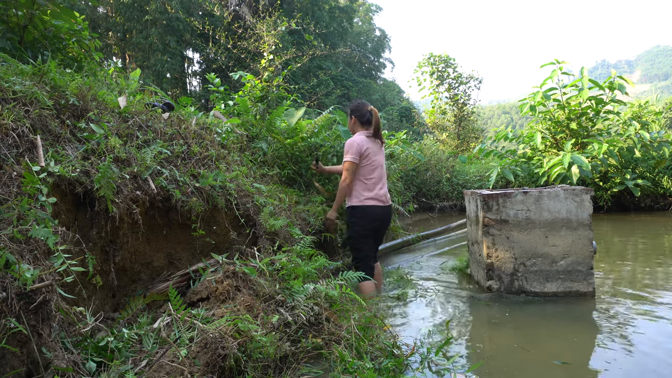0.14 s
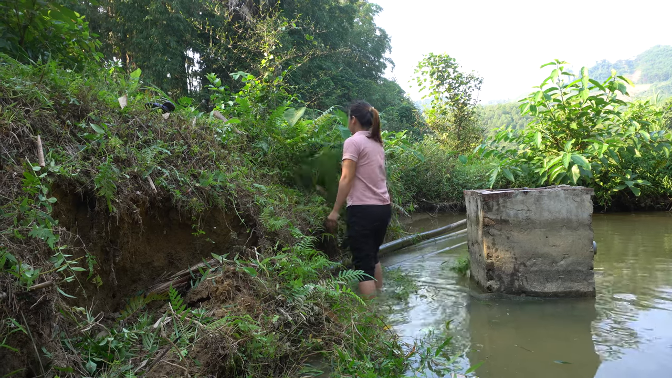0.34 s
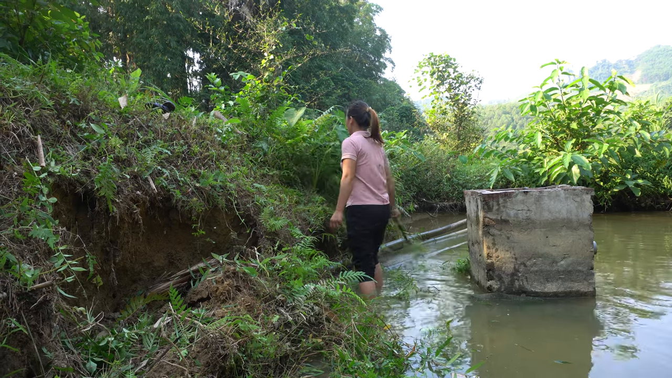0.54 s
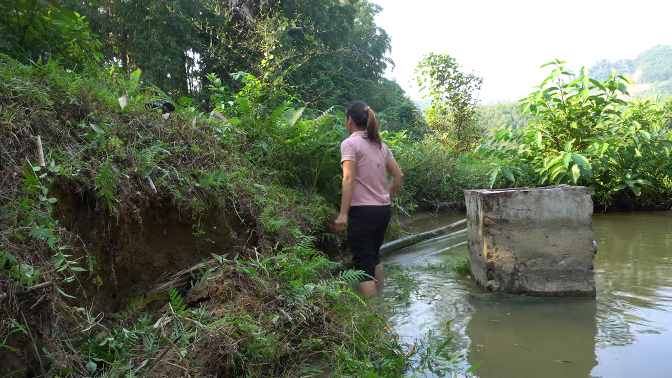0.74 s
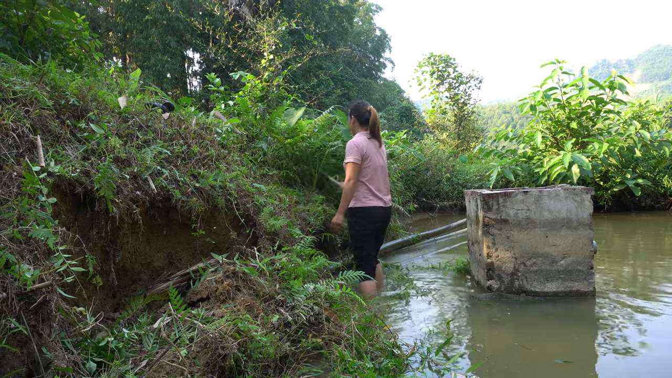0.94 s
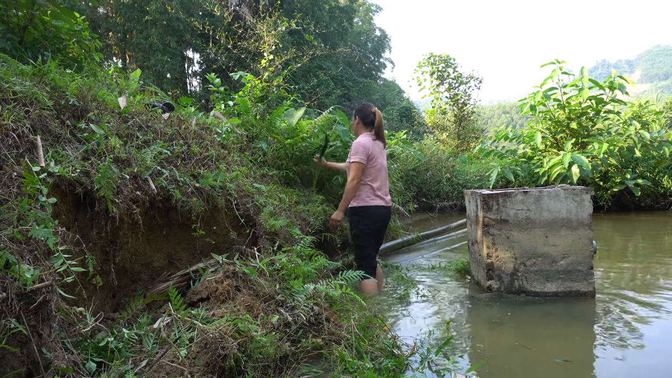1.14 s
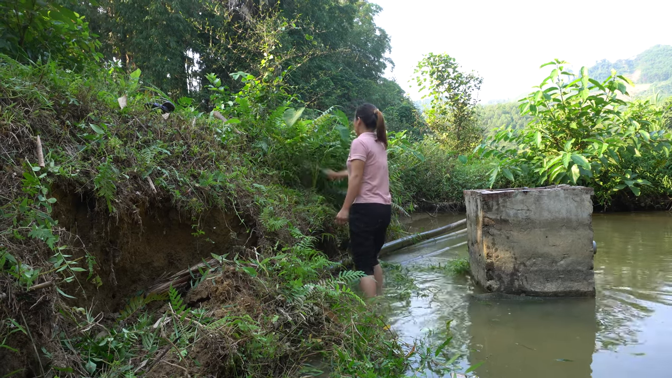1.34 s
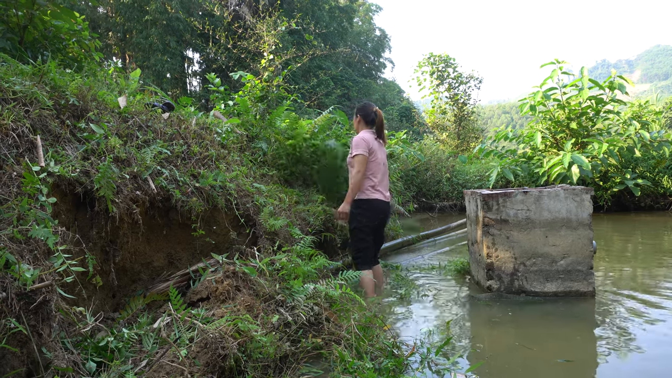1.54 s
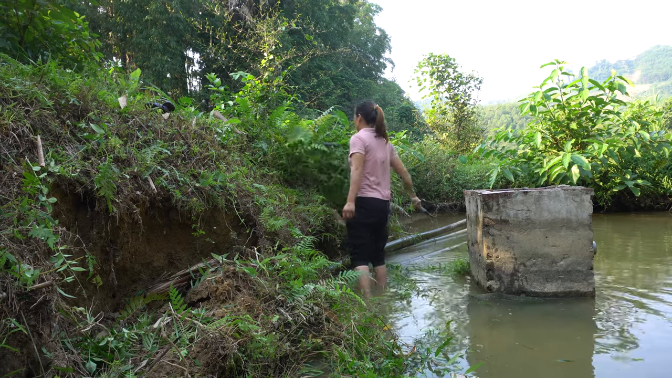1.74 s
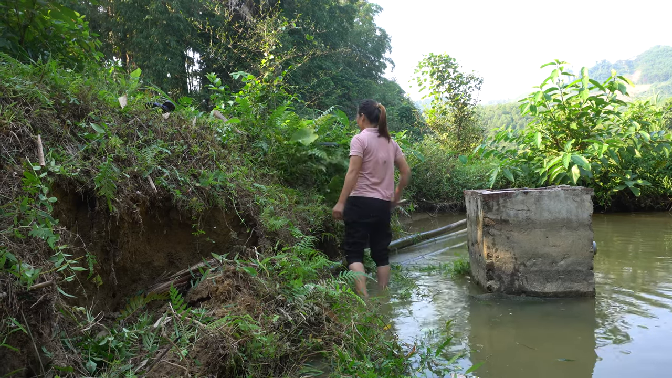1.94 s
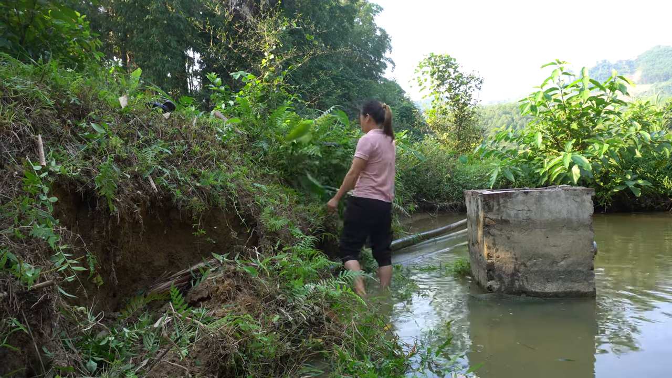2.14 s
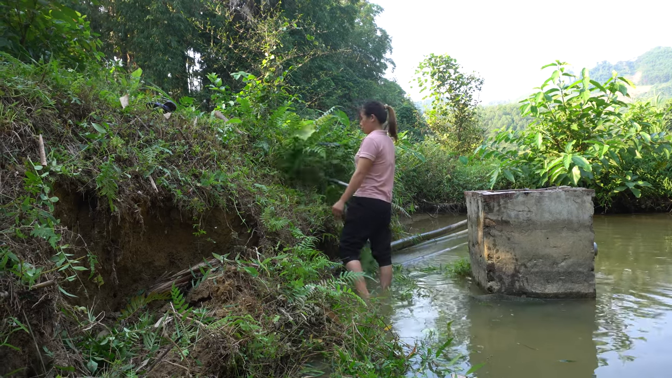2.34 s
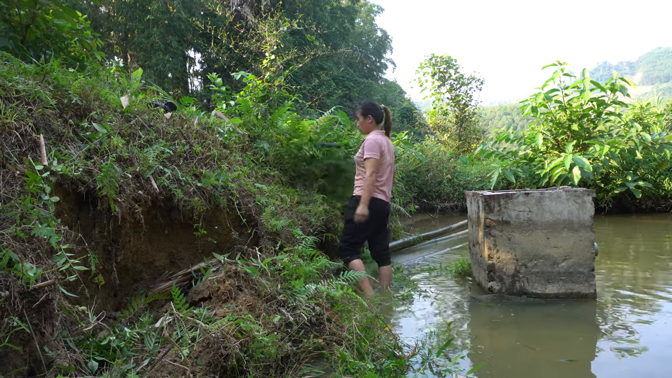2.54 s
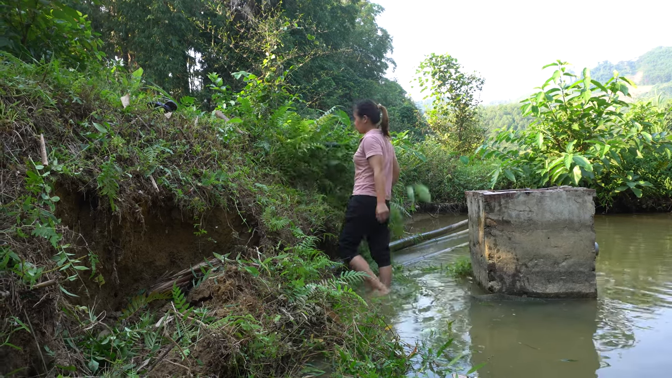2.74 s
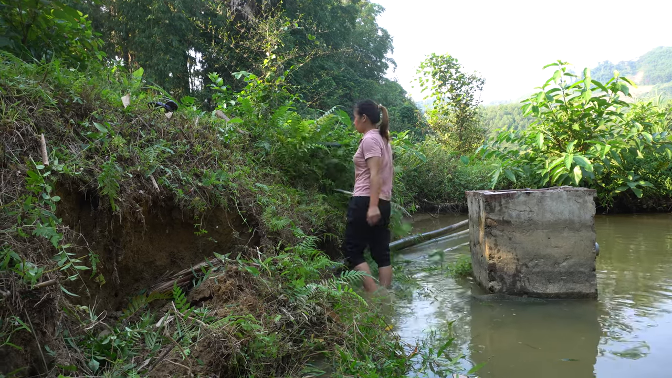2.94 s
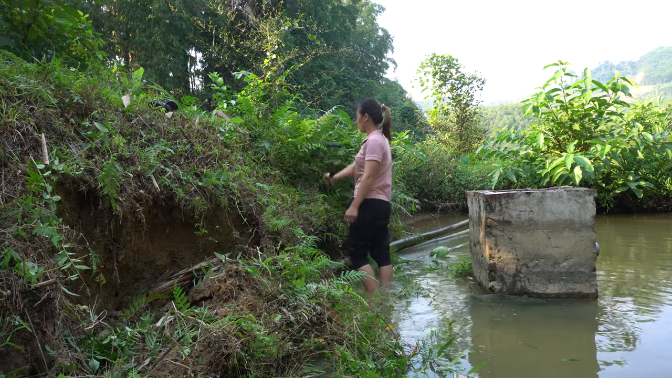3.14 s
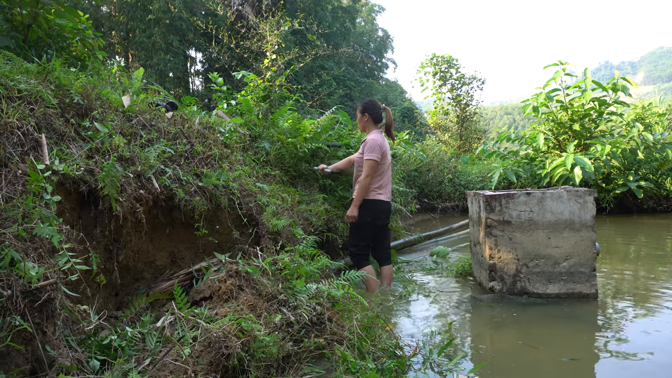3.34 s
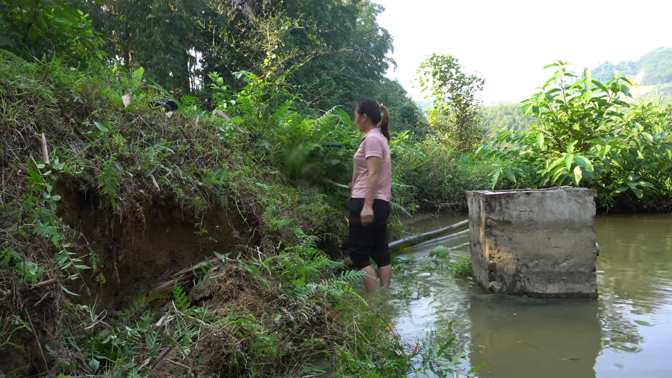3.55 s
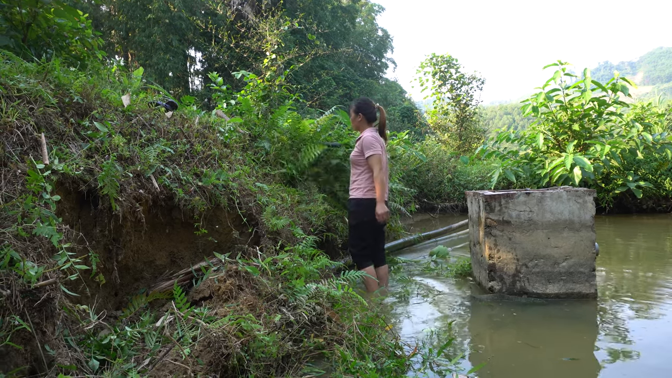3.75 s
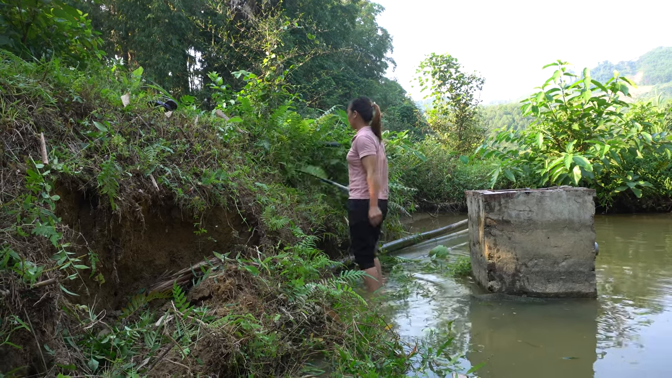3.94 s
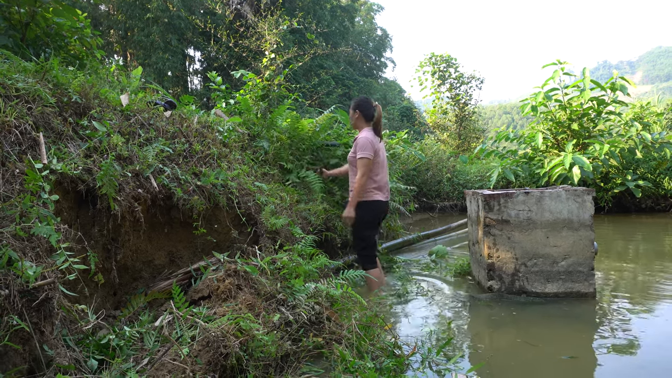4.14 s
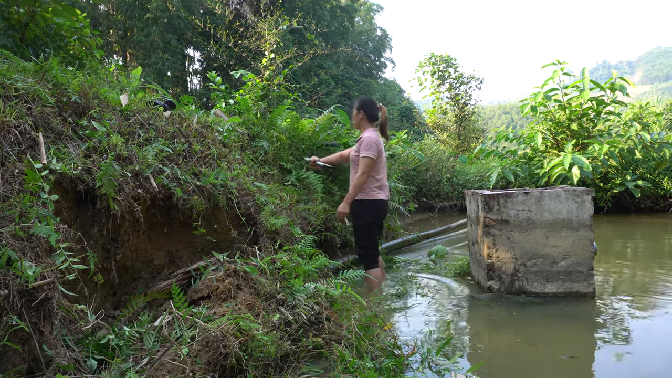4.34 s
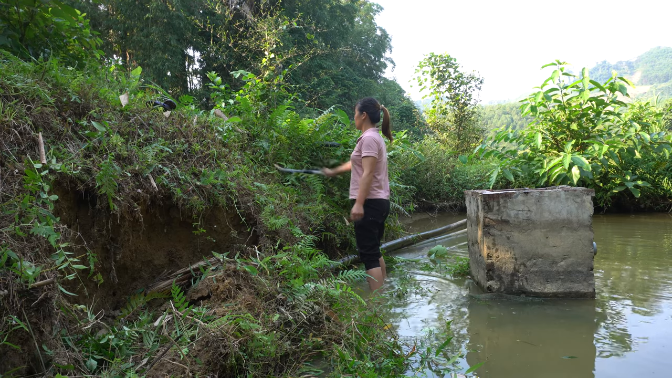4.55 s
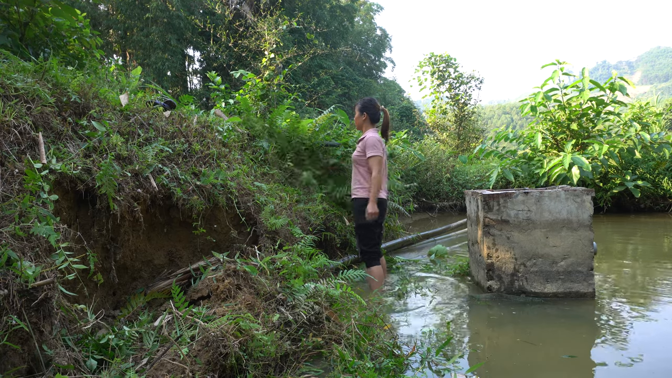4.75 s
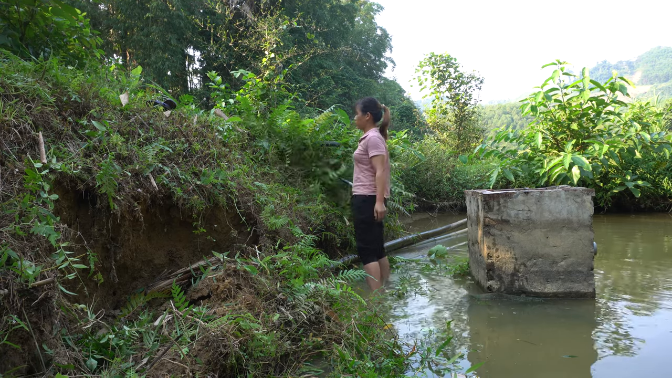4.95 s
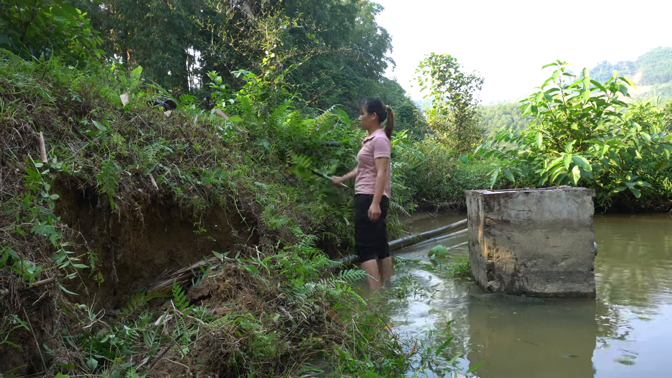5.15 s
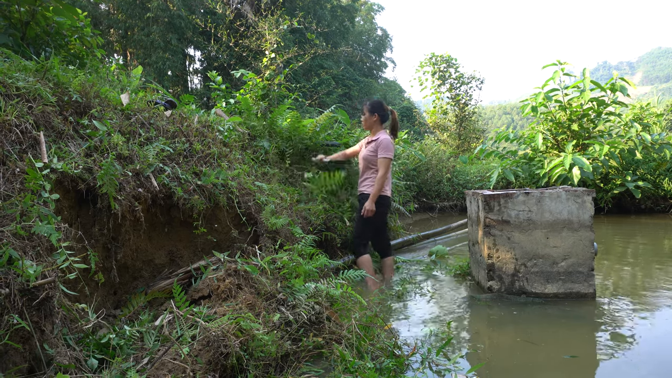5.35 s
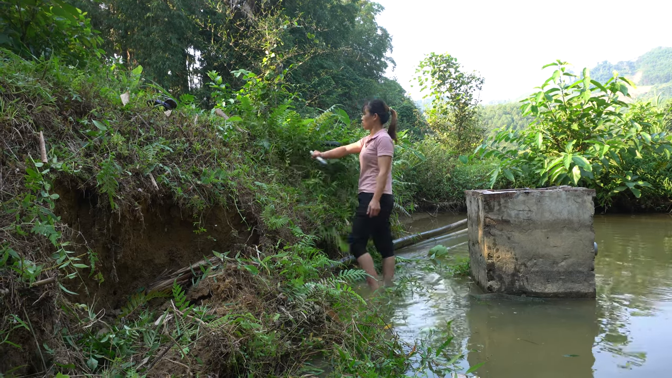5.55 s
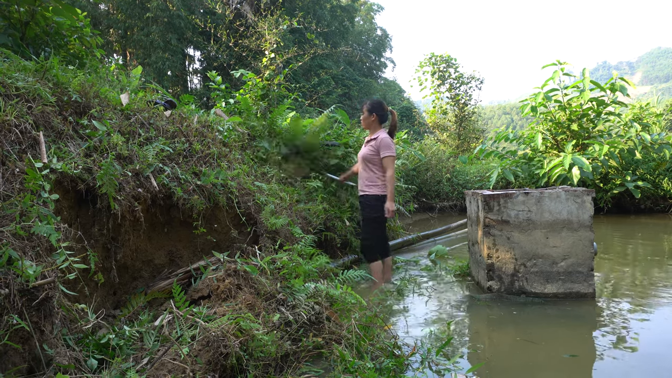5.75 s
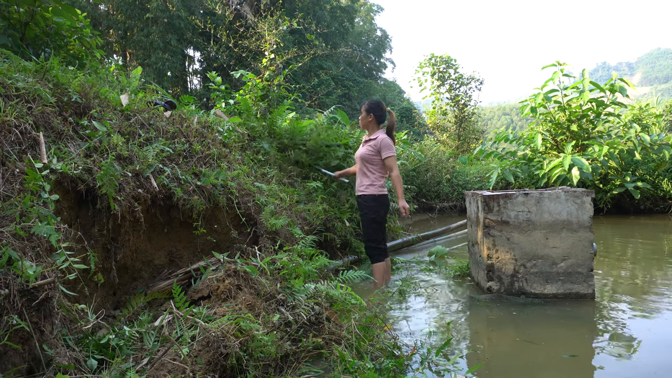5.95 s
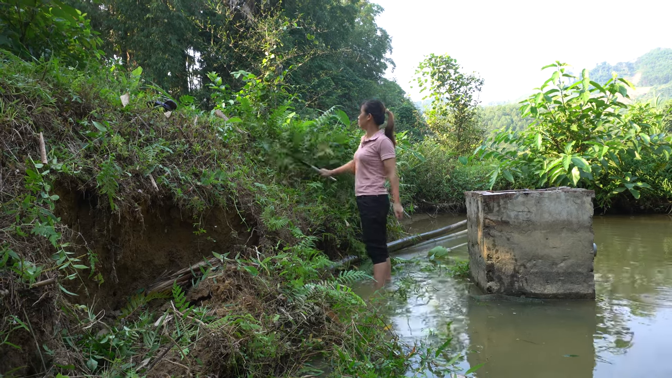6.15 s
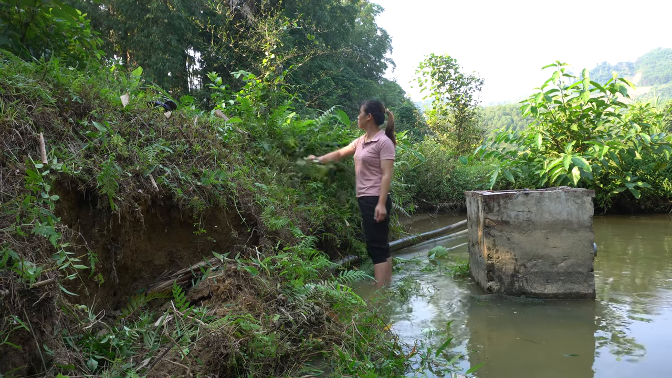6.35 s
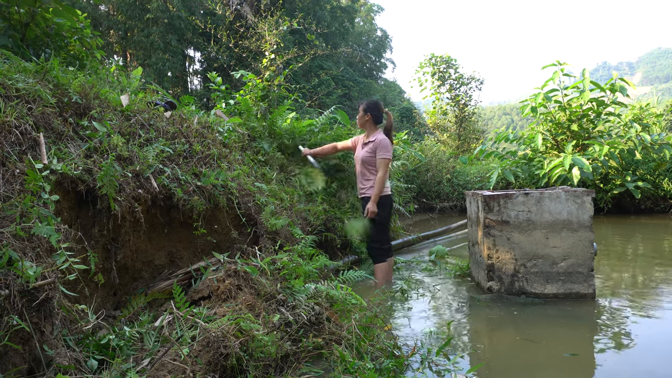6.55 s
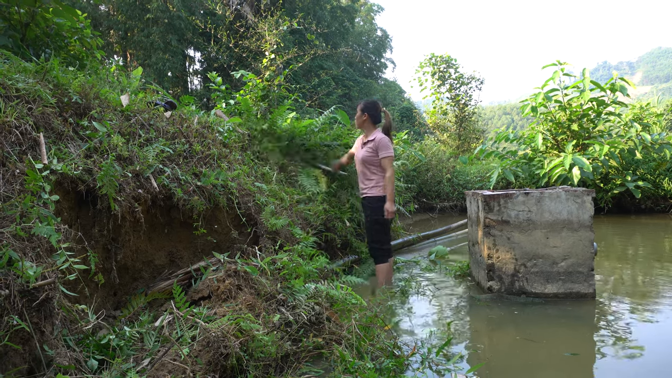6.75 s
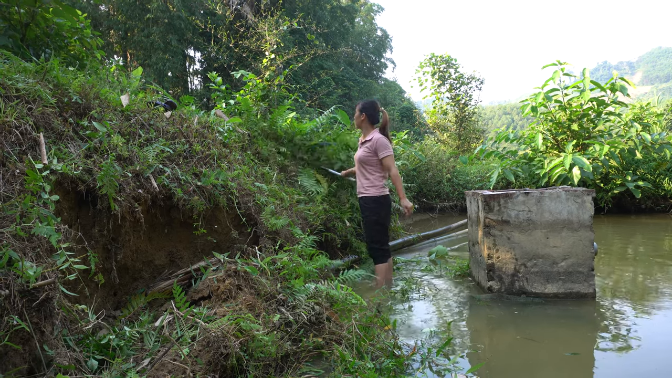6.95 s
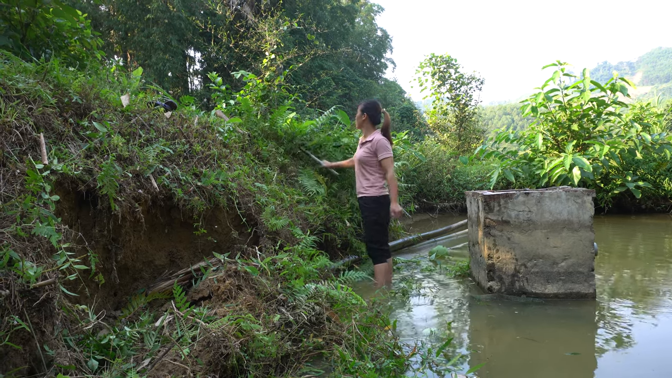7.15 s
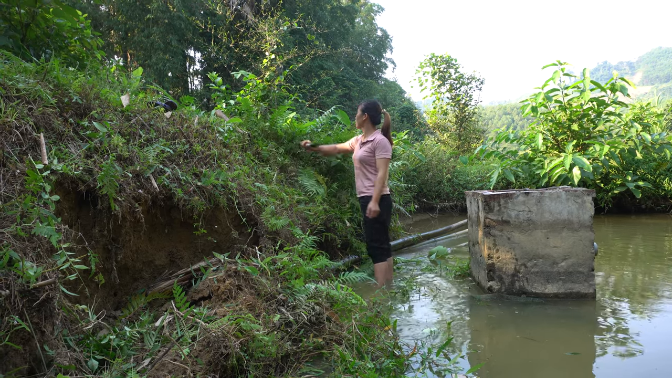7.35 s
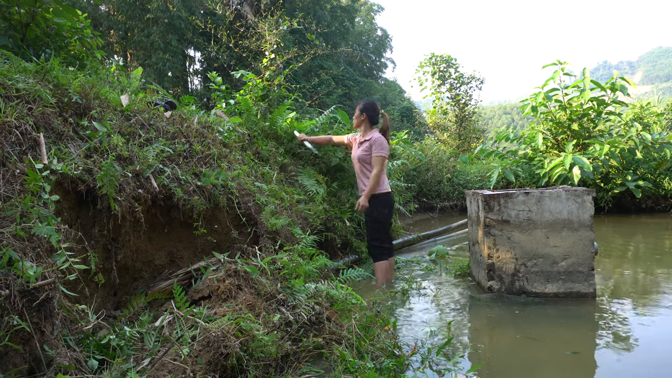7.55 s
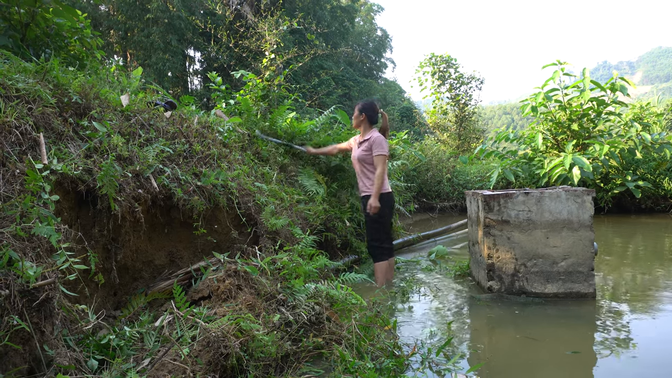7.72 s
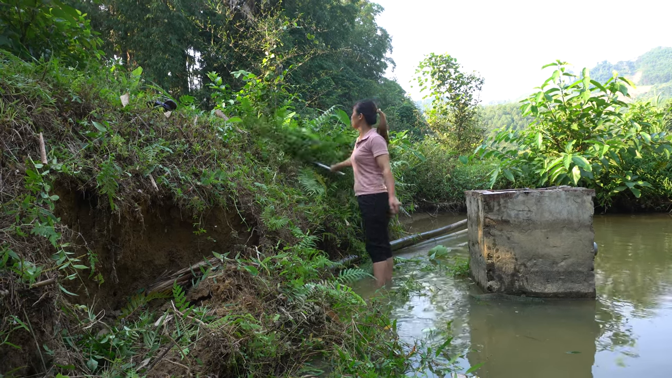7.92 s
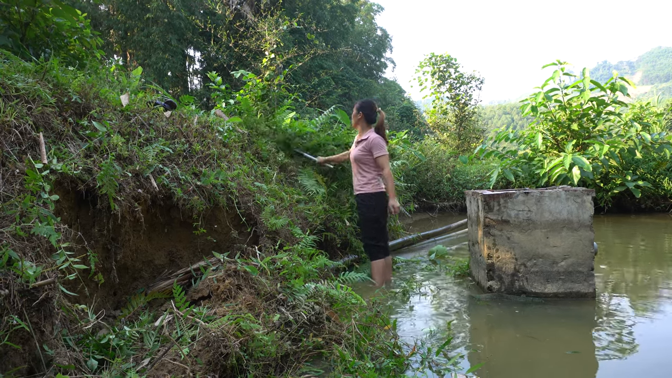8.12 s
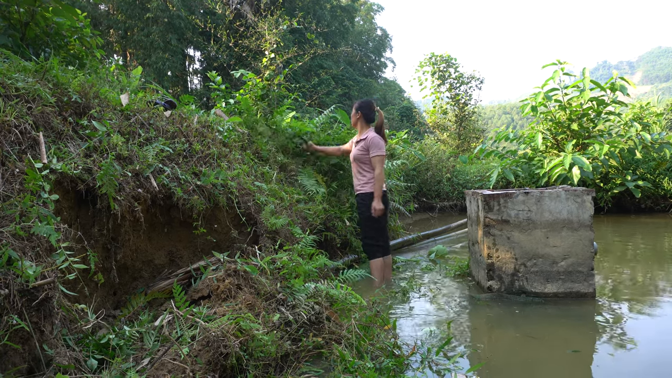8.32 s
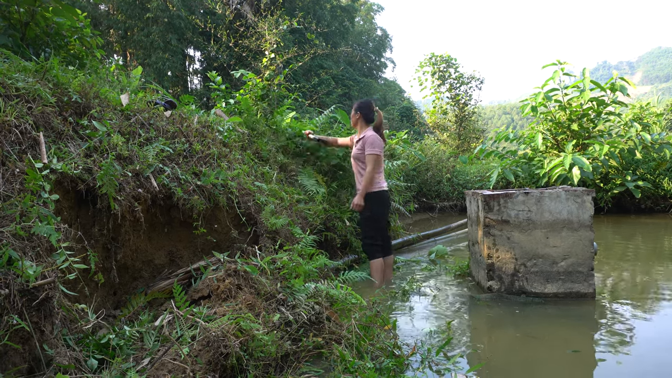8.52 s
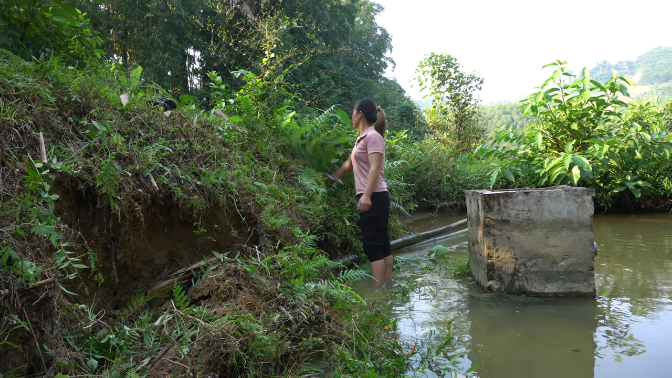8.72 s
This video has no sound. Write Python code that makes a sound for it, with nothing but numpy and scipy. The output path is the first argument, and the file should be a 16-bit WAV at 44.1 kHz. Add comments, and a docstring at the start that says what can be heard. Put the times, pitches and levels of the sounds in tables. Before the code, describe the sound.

A machete slashes repeatedly through grass and weeds on a bank, with stalks snapping, leaves rustling and water trickling alongside.

```python
"""An overgrown earth bank beside a drain. Close by, a little left of the microphone, a machete slashes
eight times through grass and weeds: each stroke tears a dense burst of fibres and thuds into the soil,
thick stalks snap, twigs tick and the cut leaves rustle as they settle. Across the whole stereo field
water bubbles along and rings the hollow drain, with drips and plops around wading feet.
The bank returns a short echo of the cuts, snaps and drips."""
import sys
import numpy as np
from scipy import signal
from scipy.fft import rfft, irfft, next_fast_len
from scipy.io import wavfile
from scipy.ndimage import map_coordinates

SR = 44100
rng = np.random.default_rng(int(sys.argv[2]) if len(sys.argv) > 2 else 0)


def output_pcm(signal):
    """Save a mono or channel-first signal as 16-bit PCM at the path in sys.argv[1].

    Samples are clipped to [-1, 1] before scaling.
    """
    pcm = np.clip(np.atleast_2d(signal).T, -1, 1) * 32767
    wavfile.write(sys.argv[1], SR, np.round(pcm).astype(np.int16))


N = 387198


def amp(db):
    """Decibels to gain."""
    return 10 ** (np.asarray(db) / 20)


def unit(x):
    """x at rms 1."""
    return x / np.sqrt(np.mean(x ** 2) + 1e-20)


def along(points, hz):
    """Rows of (freq_hz, value) read on a log frequency axis."""
    freqs, values = np.transpose(points)
    return np.interp(np.log(hz + 1), np.log(freqs + 1), values)


def wobble(rate):
    """A smooth random curve, rate knots a second."""
    knots = rng.standard_normal(int(N * rate / SR) + 4)
    return map_coordinates(knots, [np.arange(N) * rate / SR])


def swell(start_s, level_db, rise_s, t60_s):
    """Gain at every sample of a sound that grows and then dies away."""
    t = np.arange(N) / SR - start_s
    return amp(level_db - 60 * np.maximum(t - rise_s, 0) / t60_s) * np.clip(t / rise_s, 0, 1)


def filtered(x, response):
    """x shaped by a frequency response."""
    n = x.shape[-1]
    padded = next_fast_len(n + 8192)
    return irfft(rfft(x, padded) * response(np.fft.rfftfreq(padded, 1 / SR)), padded)[..., :n]


def resonance(f, hz, width):
    """Response of one damped mode."""
    return 1j * f * width / (hz * hz - f * f + 1j * f * width)


def add(track, start_s, sound):
    """Mix a sound into the track at start_s."""
    part = track[..., round(start_s * SR):][..., :sound.shape[-1]]
    part += sound[..., :part.shape[-1]]


def stereo(pair, colour, likeness):
    """Two unrelated signals become a coloured, partly alike left and right; their mid has rms 1."""
    def mid_and_side(f):
        angle = np.arccos(np.clip(along(likeness, f), -1, 1)) / 2
        return colour(f) * np.array([np.cos(angle), np.sin(angle)])
    mid, side = filtered(pair, mid_and_side)
    return np.array([mid + side, mid - side]) / np.std(mid)


def crackle(rate, spread_db):
    """Two trains of tiny noise bursts, shared in time and size, unrelated in shape."""
    hits = rng.random(N) < rate / SR
    sizes = hits * amp(spread_db * np.clip(rng.standard_normal(N), -3, 2.2))
    t = np.arange(SR // 100) / SR
    power = signal.fftconvolve(sizes ** 2, np.exp(-t / 0.00059))[:N]
    return unit(np.sqrt(np.abs(power)) * rng.standard_normal((2, N)))


def bubble(t, hz, cycles, glide):
    """A bubble rings for some cycles and rises in pitch as it nears the surface."""
    age = t * hz / cycles
    phase = 2 * np.pi * hz * t * (1 + glide * np.minimum(age, 2) / 2)
    return np.sin(phase) * amp(-60 * age) * (1 - np.exp(-t * hz))


def bubbles(rate, hz, octaves, cycles, spread_db):
    """A swarm of bubbles of random pitch and size, rms 1; the big low ones stay faint."""
    count = int(rate * N / SR)
    pitch_draw, size_draw = np.hsplit(rng.standard_normal((count, 2)), 2)
    starts = rng.integers(0, N, (count, 1))
    pitch = np.clip(hz * 2 ** (octaves * pitch_draw), 400, 14000)
    size = amp(spread_db * np.minimum(size_draw, 1.8)) * np.minimum(pitch / hz, 1)
    samples = np.arange(SR // 80)
    rings = size * bubble(samples / SR, pitch, cycles, glide=0.47)
    return unit(np.bincount((starts + samples).ravel(), rings.ravel(), N)[:N])


# Spectrum of the trickling surface: freq_hz, gain_db
WASH_SPECTRUM = [(20, -12), (45, -7.5), (150, -0.5), (380, -3.5), (500, -0.5), (1300, -2), (2000, 0.5),
                 (2450, -7), (3000, -3), (4000, -6.5), (8000, -8.5), (16000, -18)]
# Hollow resonances of the drain: pitch_hz, width_hz, gain_db
DRAIN_MODES = [(76.7, 15, 7.5), (123, 12, -1), (215, 16.2, 15), (261, 76, 3.5), (747, 37, 8),
               (847, 40, 7.5), (1071, 16.7, 6), (1790, 350, -2.5), (2130, 180, 0.5), (2810, 210, -1)]
# Left-right likeness of the water at the microphone, wider in the treble: freq_hz, correlation
WATER_LIKENESS = [(100, .99), (260, .98), (450, .84), (800, .89), (1500, .8), (2500, .65), (5000, .5),
                  (6800, .25), (8500, .6), (14000, .6)]
# Strength of the flow: time_s, gain_db
WATER_FLOW = [(0, -43.5), (1.6, -43.5), (2.8, -42.5), (3.4, -44.5), (4.0, -45), (4.6, -43.5), (6.3, -43.5),
              (8.78, -44)]
def water():
    """Bubbles and wash of the running water; its uneven gulps ring the hollow drain."""
    def hollow(f):
        return sum((-1) ** k * amp(db) * resonance(f, hz, width)
                   for k, (hz, width, db) in enumerate(DRAIN_MODES))
    swarms = [bubbles(rate=450, hz=2100, octaves=0.6, cycles=28, spread_db=4.5) for _ in range(2)]
    fizz = stereo(np.array(swarms), np.ones_like, WATER_LIKENESS)
    splashes = crackle(rate=6400, spread_db=6.5)
    wash = stereo(splashes, lambda f: amp(along(WASH_SPECTRUM, f)), WATER_LIKENESS)
    gulps = rng.standard_normal((2, N)) * amp(2.5 * wobble(24))
    drain = amp(-1) * stereo(gulps, hollow, WATER_LIKENESS)
    surface = (amp(-7) * fizz + amp(-2) * wash) * amp(1.23 * wobble(19))
    flow_db = np.interp(np.arange(N) / SR, *np.transpose(WATER_FLOW))
    return amp(flow_db) * (surface + drain)


def cracks(hz, t60_s):
    """One short woody burst per row of hz, ringing broadly around that pitch."""
    t, f = np.arange(2048) / SR, np.fft.rfftfreq(2048, 1 / SR)
    colour = resonance(f, hz, 0.85 * hz) ** 2 + 0.3 * resonance(f, 9000, 12000)
    noise = irfft(rfft(rng.standard_normal((len(hz), len(t)))) * colour)
    onset = 1 - np.exp(-t / (t60_s / 70))  # the fibres give way one after another
    return 0.75 * noise / noise.std(axis=1, keepdims=True) * amp(-60 * t / t60_s) * onset


def stems(rate, hz, octaves, t60_s, spread_db):
    """Thin stems crack at random, each with its own pitch, size and direction; stereo, rms 1."""
    count = int(rate * N / SR)
    pitch_draw, size_draw, pan_draw = np.hsplit(rng.standard_normal((count, 3)), 3)
    pitch = np.clip(hz * 2 ** (octaves * pitch_draw), 1000, 14000)
    snaps = cracks(pitch, t60_s) * amp(spread_db * np.minimum(size_draw, 1.6))
    samples = (rng.integers(0, N, (count, 1)) + np.arange(snaps.shape[1])).ravel()
    panned = [snaps * amp(side * 2.3 * pan_draw) for side in (1, -1)]
    return unit(np.array([np.bincount(samples, channel.ravel(), N)[:N] for channel in panned]))


# Foliage pushed aside between strokes: start_s, level_db, rise_s, t60_s
FOLIAGE_PUSHES = [(1.88, -47.5, .17, 0.88), (2.27, -31.5, .24, 1.44)]
def stirring():
    """Leaf movement in dB: cut tufts topple and settle, foliage is pushed aside, nothing quite rests."""
    settling = [swell(start_s, settle_db, rise_s=0.4, t60_s=0.96) for start_s, *_, settle_db in CUTS]
    pushed = [swell(*push) for push in FOLIAGE_PUSHES]
    resting = amp(-51)
    return 10 * np.log10(resting ** 2 + sum(gain ** 2 for gain in settling + pushed))


# Spectrum of leaf sliding on leaf: freq_hz, gain_db
LEAF_SPECTRUM = [(200, -6), (1000, -1.5), (2500, -0.5), (6000, 4), (10000, 1), (16000, 2)]
def leaves():
    """Cut leaves slide and settle just left of centre: a soft brush with ticks of stems on top."""
    likeness = [(1000, 0.94), (6000, 0.28), (12000, 0.67)]  # freq_hz, correlation
    contacts = crackle(rate=4200, spread_db=-1.5)
    brush = stereo(contacts, lambda f: amp(along(LEAF_SPECTRUM, f)), likeness)
    ticks = stems(rate=55, hz=8500, octaves=0.55, t60_s=0.034, spread_db=4)
    stir_db = stirring()
    ticks_db = -27.3 + 0.45 * stir_db  # single stems keep ticking when the brush has died down
    rustle = amp(stir_db - 3 + 1.7 * wobble(30)) * brush + amp(ticks_db) * ticks
    return lean_left(rustle, amount=0.5)


# How far the grass leans to the microphone's left: freq_hz, left_minus_right_db
GRASS_BALANCE = [(200, 0), (2800, 0), (4000, 5), (8000, 4), (10700, 4.7), (13500, 2.5)]
def lean_left(x, amount):
    """The treble of a source on the left is louder in the left channel."""
    sides = amount * np.array([[0.5], [-0.5]])
    return filtered(x, lambda f: amp(along(GRASS_BALANCE, f) * sides))


def twigs():
    """Loose twigs give way at random, 1 dB louder with each stroke as the cuttings pile up."""
    cuts_made = sum(np.arange(N) / SR > start_s for start_s, *_ in CUTS)
    snaps = stems(rate=8, hz=4800, octaves=0.6, t60_s=0.018, spread_db=2)
    return amp(-60 + cuts_made) * snaps


# Thick stalks on the bank: start_s, level_db, pitch_hz
STALK_SNAPS = [(.089, -25, 2300), (.7165, -26.5, 3020), (1.251, -23, 2740), (1.4872, -13, 1280),
               (1.4869, -12, 3240), (2.428, -19, 2470), (3.5785, -22, 4500), (3.7808, -22.5, 3140),
               (4.1863, -23.5, 2760), (5.167, -21.5, 3240), (5.294, -25, 4540), (5.352, -26.5, 3230),
               (5.775, -20, 2400), (6.0924, -22.5, 3600), (6.3533, -22.5, 3350), (6.419, -23.5, 2950),
               (6.608, -22.5, 2880), (6.7882, -14, 1900), (6.8516, -21, 5200), (8.014, -22, 3300),
               (8.73, -11, 2270), (8.7352, -14, 1760)]
def stalks():
    """A stalk parts or springs back with a short woody crack, slightly to the left."""
    out = np.zeros(N)
    starts, levels, pitches = np.transpose(STALK_SNAPS)
    for start_s, level_db, crack in zip(starts, levels, cracks(pitches[:, None], t60_s=0.024)):
        add(out, start_s, amp(level_db) * crack)
    return out * amp([[0.5], [-0.5]])


# Spectrum of tearing fibres: freq_hz, gain_db
FIBRE_SPECTRUM = [(100, -6), (400, -7), (800, 1.5), (1400, -7), (2300, .5), (3900, -0.5), (6000, 1),
                  (9000, 0.5), (11000, -1), (12800, 2.5), (16000, -1.5)]
# Spectrum of the blade's thud in the soil: freq_hz, gain_db
SOIL_SPECTRUM = [(25, -32), (70, -12), (120, -4.5), (220, 4.5), (350, -17), (800, -10), (2000, -11),
                 (6000, -60)]
# Left-right likeness of the cutting at the microphone, a narrow image: freq_hz, correlation
GRASS_LIKENESS = [(150, .99), (700, .94), (2400, .98), (3900, .8), (5000, .94), (9000, .96), (15000, .96)]
# Machete strokes, close by:
# start_s, level_db, rise_s, cutting_s, force_loss_db, t60_s, thud_db, thud_delay_s, settle_db
CUTS = [(.353, -20.5, 0.0099, 0.078, 9, 0.55, -30.5, 0.014, -44),
        (1.452, -21, 0.02, 0.045, 5, 0.49, -28, 0.034, -49),
        (3.546, -20.5, 0.014, 0.11, 11, 0.12, -38, 0.036, -61),
        (4.614, -20.5, 0.023, 0.11, 9, 0.19, -38, 0.018, -41.5),
        (5.703, -23.5, 0.026, 0.046, -2.5, 0.3, -38, 0.06, -40),
        (6.701, -20.5, 0.032, 0.058, 3.5, 0.46, -32.5, 0.073, -45),
        (7.754, -22, 0.03, 0.053, -1.5, 0.24, -28.5, 0.079, -41),
        (8.708, -20, 0.025, 0.06, 6.5, .4, -37.5, 0.033, -44)]
def machete():
    """The blade bites, tears through tuft after tuft and bumps the soil; the cut grass collapses."""
    tearing, bump, t = np.zeros(N), np.zeros(N), np.arange(SR) / SR
    for start_s, level_db, rise_s, cutting_s, force_loss_db, t60_s, thud_db, thud_delay_s, _ in CUTS:
        bite = np.minimum(t / rise_s, 1)
        force_db = -force_loss_db * np.clip((t - rise_s) / cutting_s, 0, 1)
        fade_db = -60 * np.maximum(t - rise_s - cutting_s, 0) / t60_s
        collapse_db = -9 - 60 * t / 0.81
        add(tearing, start_s, amp(level_db) * bite * np.hypot(amp(force_db + fade_db), amp(collapse_db)))
        thud = amp(thud_db - 60 * t / 0.24) * (1 - np.exp(-t / 0.0029))
        add(bump, start_s + thud_delay_s, thud)
    tufts = amp(0.9 * wobble(60))
    fractures = crackle(rate=6900, spread_db=0.5)
    fibres = stereo(fractures, lambda f: amp(along(FIBRE_SPECTRUM, f)), GRASS_LIKENESS)
    crunch = stems(rate=170, hz=5800, octaves=0.9, t60_s=0.015, spread_db=3)
    grass = tearing * tufts * (amp(-1) * fibres + amp(-10.5) * crunch)
    soil = stereo(rng.standard_normal((2, N)), lambda f: amp(along(SOIL_SPECTRUM, f)), GRASS_LIKENESS)
    return lean_left(grass, amount=1) + bump * soil


# Legs shifting in the water beside the bank: start_s, level_db
LEG_SHIFTS = [(1.55, -47), (2.36, -45), (2.9, -45.5), (4.17, -43), (4.85, -48)]
def wading():
    """Each shift of the legs churns up a cloud of plopping bubbles that fades away."""
    churn = sum(swell(start_s, level_db, rise_s=0.11, t60_s=1.67) for start_s, level_db in LEG_SHIFTS)
    swarms = [bubbles(rate=130, hz=1650, octaves=0.5, cycles=22, spread_db=4.5) for _ in range(2)]
    return churn * stereo(np.array(swarms), np.ones_like, WATER_LIKENESS)


# Drips and plops around the feet: start_s, level_db, pitch_hz, ring_cycles, spray_db
DROPS = [(1.802, -31, 1060, 39, -19), (2.9695, -20, 1320, 17, -7), (2.9826, -18, 2200, 21, 1.5),
         (2.9955, -10.5, 1520, 8.1, -6), (3.001, -12, 1110, 10.6, -18), (3.006, -22, 3100, 49, -23),
         (3.037, -29, 3150, 48, -13), (8.31, -22, 1670, 21, 1), (8.4065, -8, 1810, 13.2, -18.5),
         (8.472, -23, 2850, 15, -4)]
def drips():
    """Each drop throws spray and traps a bubble; the fewer cycles it rings, the more it chirps upward."""
    out, t = np.zeros((2, N)), np.arange(SR // 8) / SR
    for start_s, level_db, pitch_hz, ring_cycles, spray_db in DROPS:
        noise = rng.standard_normal((2, len(t)))
        hiss = stereo(noise, lambda f: resonance(f, 1640, 5300) ** 2 + 0.25, WATER_LIKENESS)
        spray = 0.38 * amp(spray_db - 60 * t / 0.031) * hiss
        plop = 1.1 * bubble(t, pitch_hz, ring_cycles, glide=(11 / ring_cycles) ** 2)
        add(out, start_s, amp(level_db) * (plop + spray))
    return out


# Deep swells from inside the drain: start_s, level_db, length_s
DRAIN_SWELLS = [(2.802, -44, 0.16), (7.72, -42, 0.1), (8.174, -45.5, 0.35)]
def drain_booms():
    """Now and then the lowest note of the drain swells and sinks back."""
    out, lowest_hz = np.zeros(N), DRAIN_MODES[0][0]
    for start_s, level_db, length_s in DRAIN_SWELLS:
        t = np.arange(int(length_s * SR)) / SR
        arch = np.sin(np.pi * t / length_s)
        add(out, start_s, amp(level_db) * arch * np.sin(2 * np.pi * lowest_hz * t))
    return out * amp(0.67 * wobble(18))


# Decay of the echo off the bank: freq_hz, t60_s
BANK_DECAY = [(200, 0.057), (2000, 0.11), (12000, 0.36)]
def bank_echo(x):
    """A short diffuse answer from the bank and the water, longest in the treble."""
    hz, t, spectra = signal.stft(rng.standard_normal((2, SR // 4)), SR, nperseg=256)
    decay = amp(-60 * t / along(BANK_DECAY, hz)[:, None])
    _, tail = signal.istft(spectra * decay, SR, nperseg=256)
    return signal.fftconvolve(x, tail / np.linalg.norm(tail[0]), axes=1)[:, :N]


def scene():
    """From the microphone: blade and leaves a little to the left, water all around."""
    cuts = machete()
    clicks = stalks() + twigs() + drips()
    direct = cuts + clicks + leaves() + water() + wading() + drain_booms()
    return direct + bank_echo(amp(-27) * cuts + amp(-5.5) * clicks)


def record(dry):
    """The microphone chain passes nothing above its band limit."""
    return filtered(dry, lambda hz: hz < 15950)


dry = scene()
out = record(dry)
output_pcm(out)
```